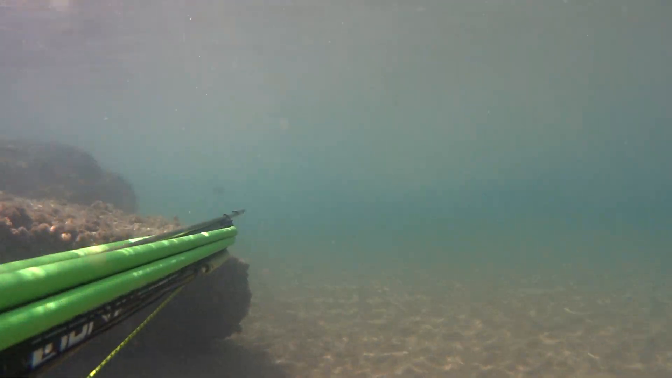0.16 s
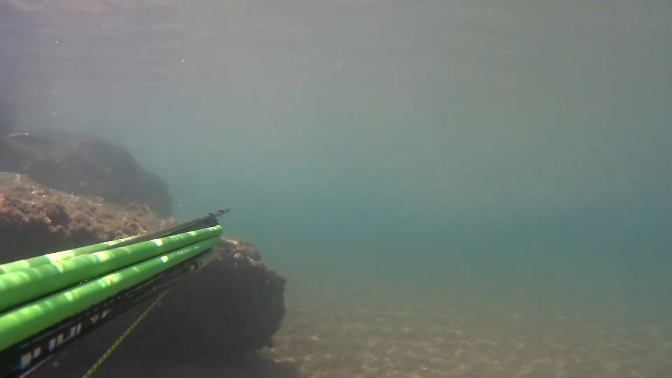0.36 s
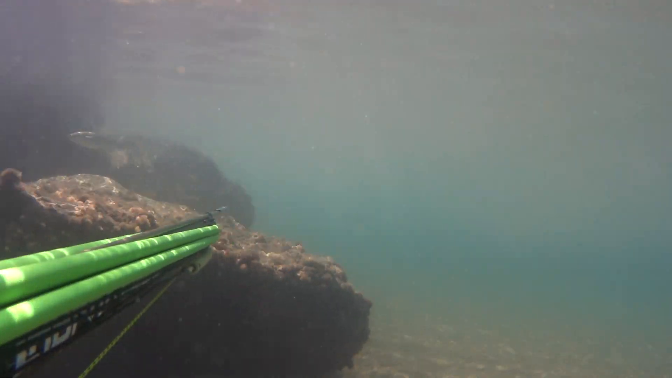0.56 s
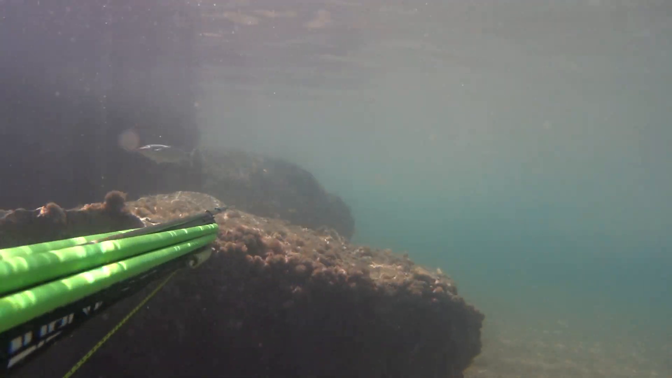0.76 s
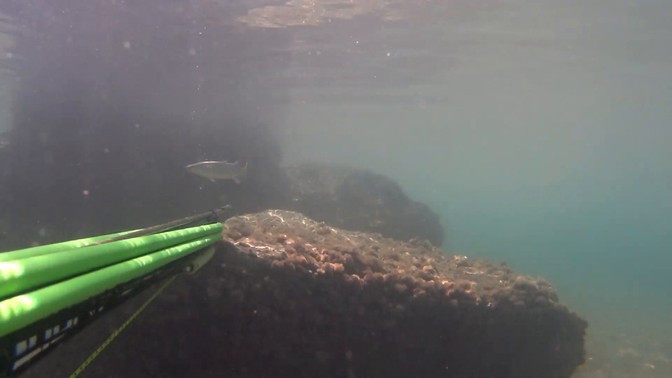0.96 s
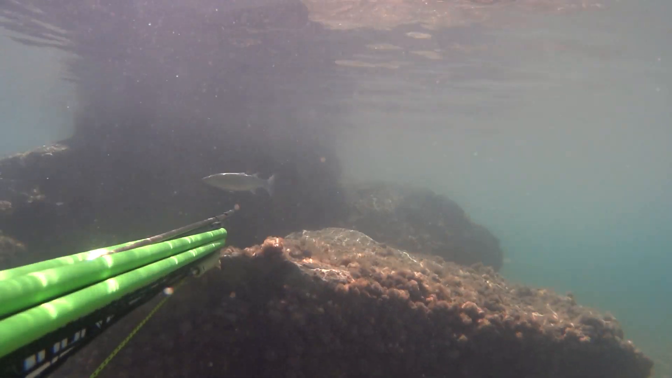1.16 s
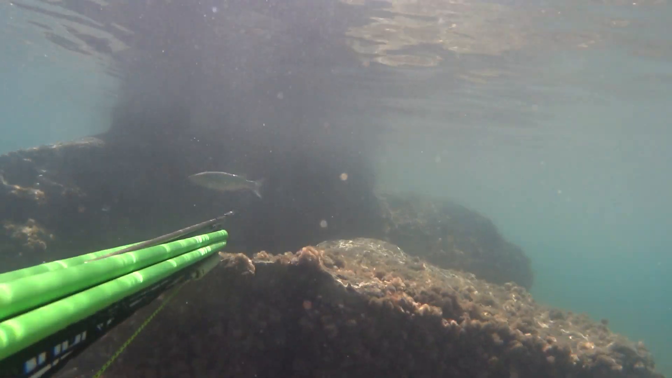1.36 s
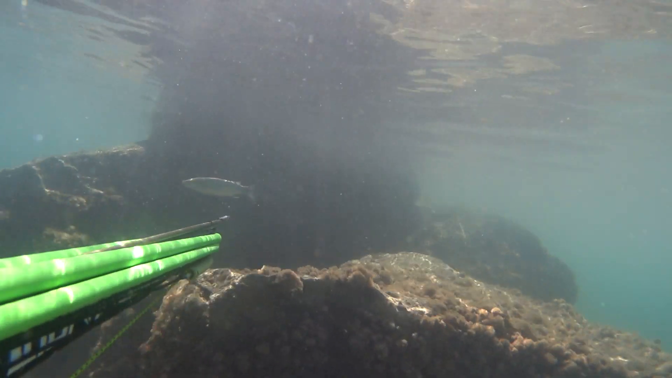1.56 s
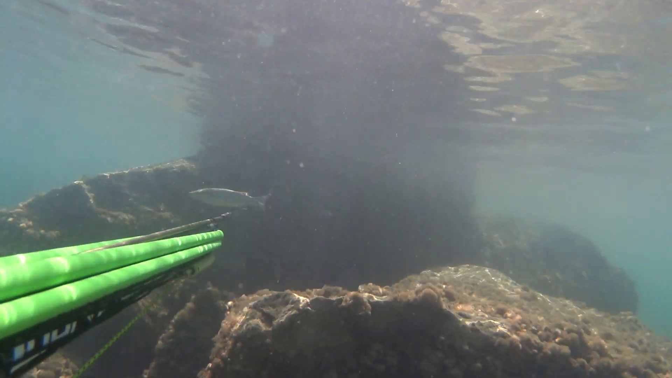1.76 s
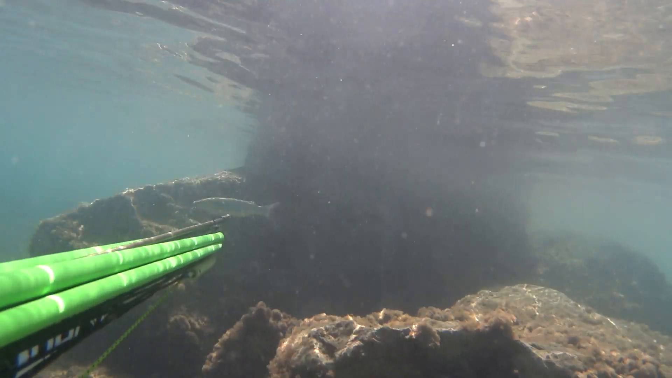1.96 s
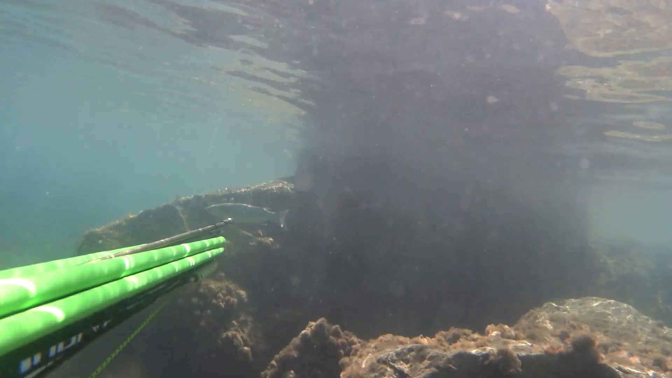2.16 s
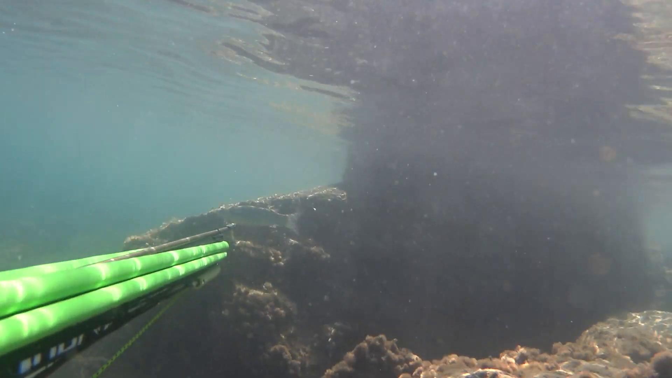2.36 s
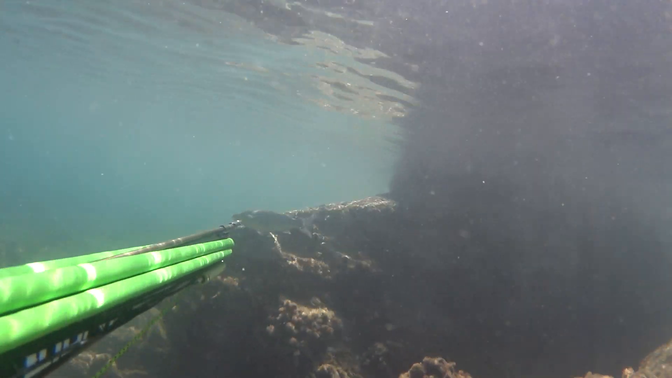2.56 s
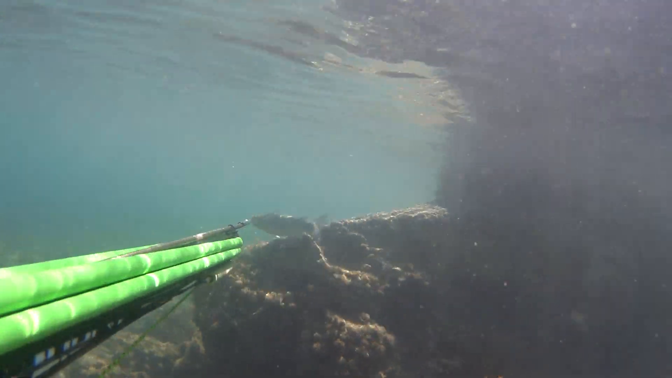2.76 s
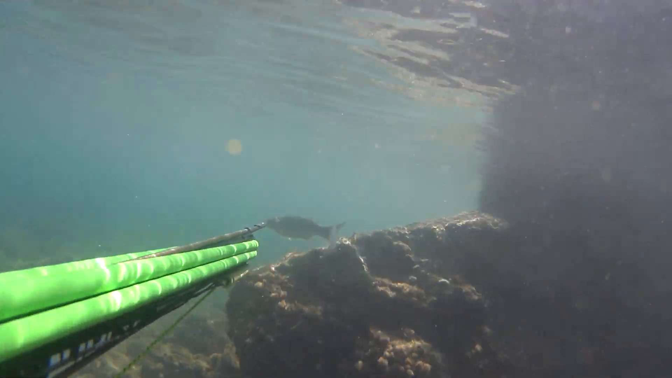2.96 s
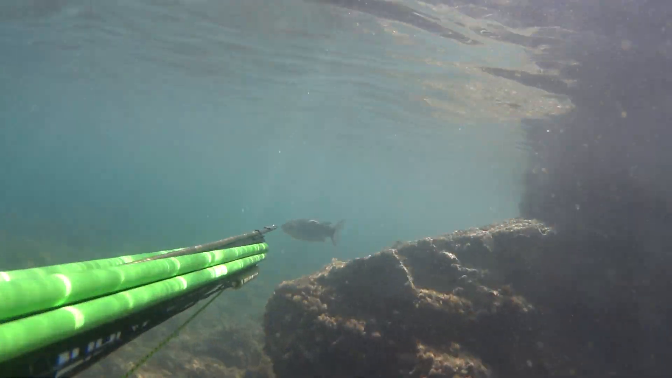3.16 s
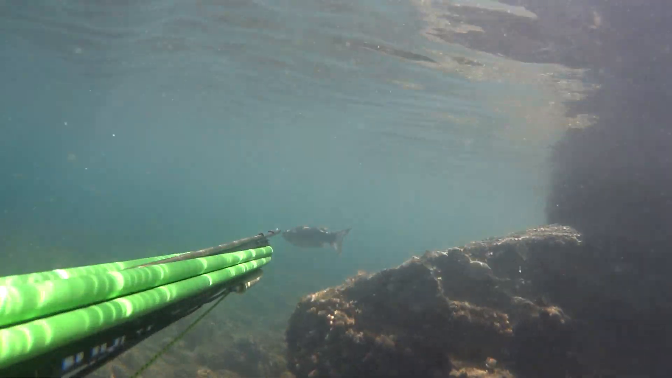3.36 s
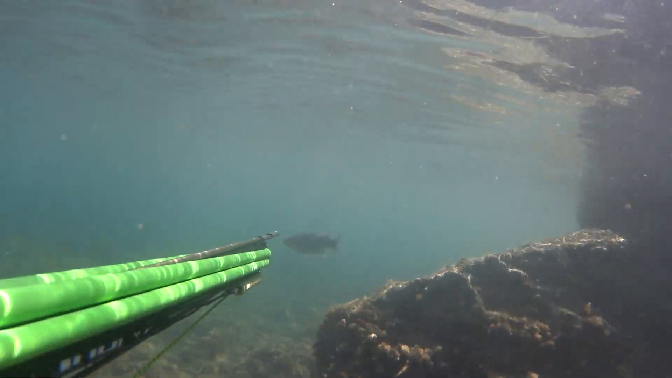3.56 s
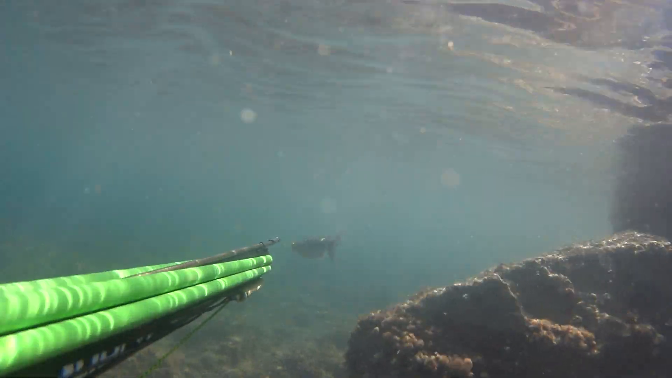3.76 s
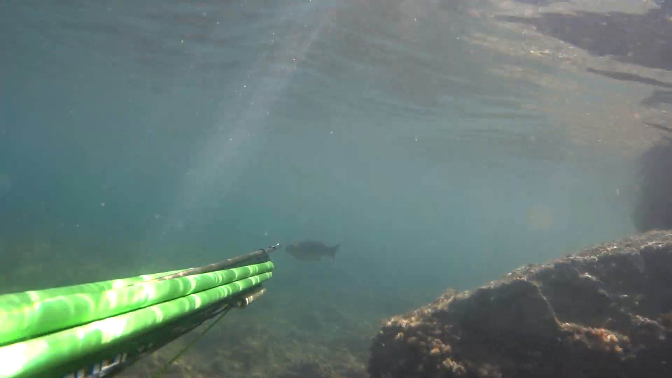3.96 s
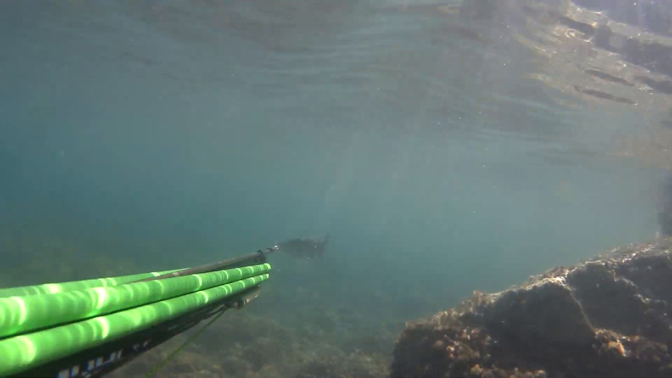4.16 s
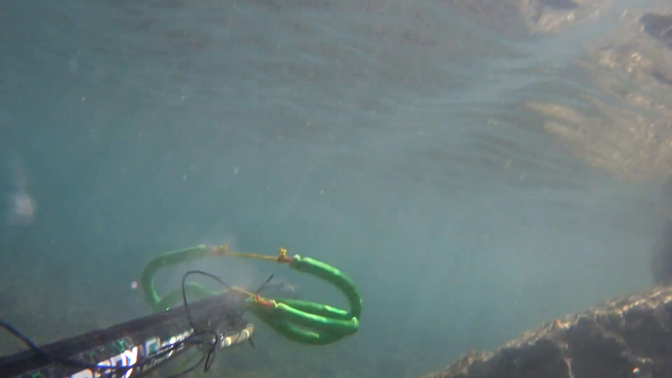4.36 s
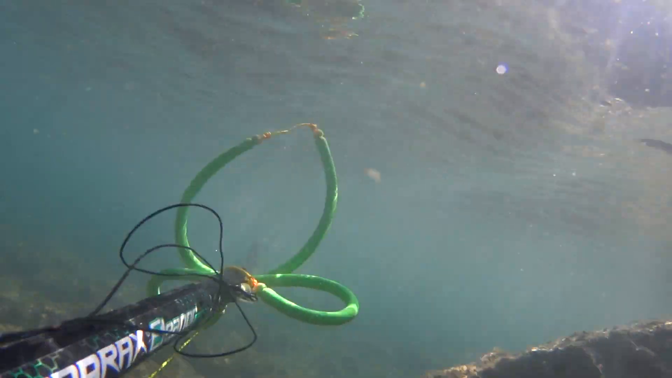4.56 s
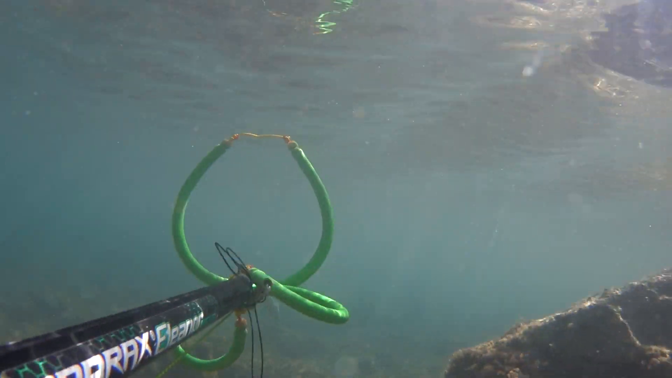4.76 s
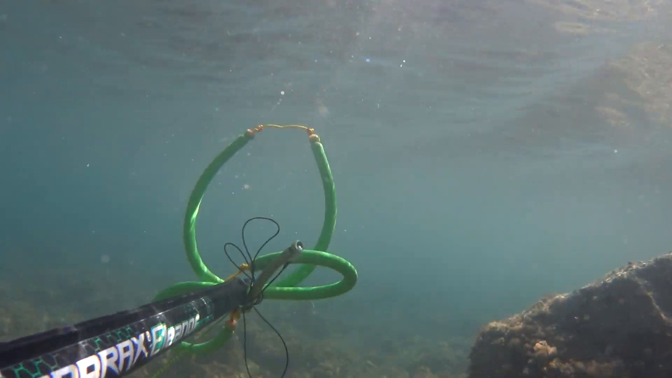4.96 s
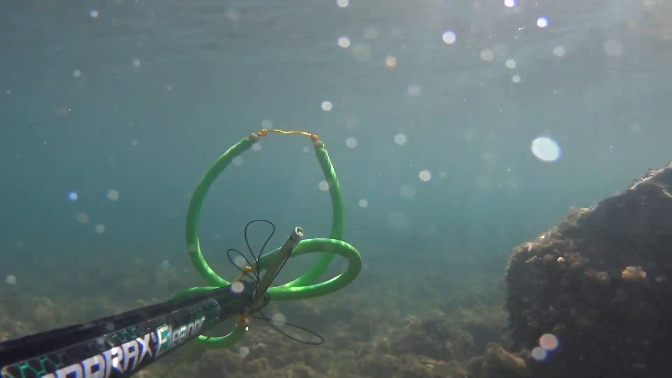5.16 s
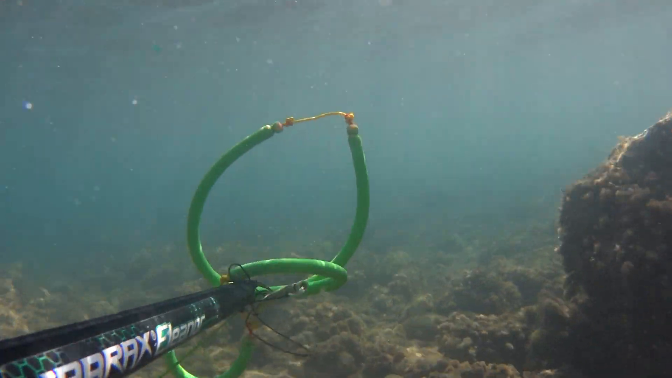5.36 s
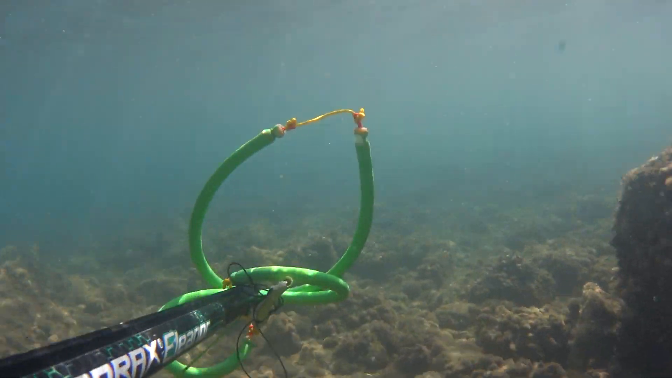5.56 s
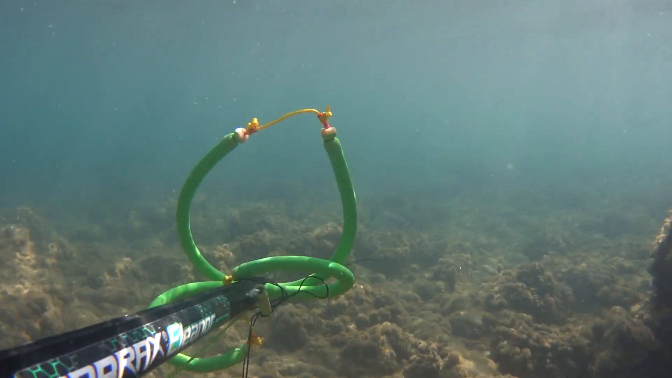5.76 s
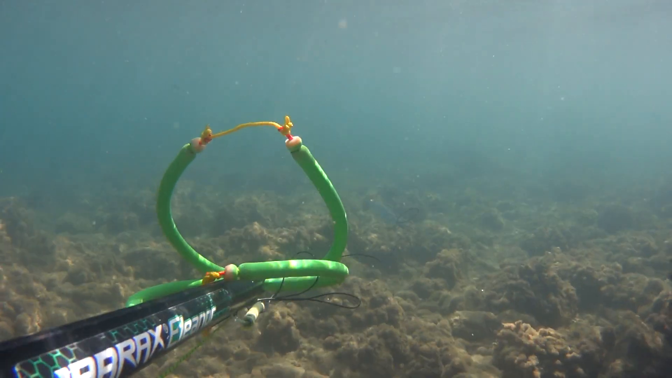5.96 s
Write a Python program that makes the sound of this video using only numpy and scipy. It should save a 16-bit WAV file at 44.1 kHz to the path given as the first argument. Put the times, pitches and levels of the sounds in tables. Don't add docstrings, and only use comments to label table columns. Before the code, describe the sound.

Under shallow water, two microphones sealed on the gun catch constant wide hiss and sparse tiny crackles. A hand knocks the housing softly, then only occasional ticks remain. The trigger lets go with a very loud boxy crack, rapid rubber slaps and a grainy watery rush that dies quickly. The running line tugs and snaps taut in a second bright crack, ringing the steel shaft briefly, before quiet knocking and scraping.

```python
import sys
import numpy as np
from scipy import signal
from scipy.fft import rfft, irfft, next_fast_len
from scipy.io import wavfile

SR = 44100
rng = np.random.default_rng(int(sys.argv[2]) if len(sys.argv) > 2 else 0)


def store_pcm(level_fs):
    pcm = np.round(np.clip(level_fs, -1, 1) * 32767).astype(np.int16)
    wavfile.write(sys.argv[1], SR, np.atleast_2d(pcm).T)


def attenuation_scalar(level_db):
    decades = np.asarray(level_db, float) / 20
    return 10 ** decades


N = 265482
TRIGGER_S, TAUT_S = 4.33, 4.768

# pitch_hz, t60_s, level_db, left_right_db, left_lead_rad
HOUSING_MODES = [
    [(64, 0.082, -11, -4.5, 0.6), (120.3, 0.048, 1, -4.5, 1.3), (175, 0.065, -4.5, -3.5, 1.1)],
    [(236.3, 0.055, -3, 0.75, 2.791), (311.4, 0.049, 0, -0.2, 2.415), (428.25, 0.0342, -2, 2.5, 1.51),
     (508, 0.054, -3.5, 1.5, 2.61)],
    [(642.9, 0.019, -0.5, 2, -2.003), (746.6, 0.03115, 0.6, 3.5, -2.012), (874.6, 0.018, -3, 1.5, -1.77)],
    [(999.8, 0.021, -10, -1.5, -1.2), (1158, .024, -8, -4, -1.1), (1320, 0.0244, -2, -5.5, -0.84),
     (1410, 0.02054, -1, -2.5, -1.3), (1600.3, 0.015, -9, -5.5, -0.85), (1925, 0.014, -11, 6.5, 1),
     (2313, 0.016, -21.5, -2, 0.67)],
]
# start_s, peak_db, body_db (relative), favoured_ring_hz
GRIT_TICKS = [(0.7205, -48, -25.5, 1476), (0.7617, -45, -13.5, 1400), (1.0074, -54.5, -20, 1410),
              (1.1215, -54, -7, 950), (1.145, -55, -11.5, 1397), (1.2956, -33, -1, 921.6),
              (1.579, -44.5, -24.5, 1390), (1.589, -40.5, -17.5, 1088), (2.2802, -46, -24.5, 1384),
              (2.423, -41.5, -19.5, 1235), (2.5264, -43, -24.5, 1379), (2.6045, -48, -10, 1401),
              (2.6624, -53, -23, 1381), (2.8413, -41, -35.5, 1410), (2.9384, -58, 3.5, 1320),
              (2.764, -53, -9.5, 1283), (3.092, -42, -22.5, 1150), (3.9234, -51, -6.5, 1132),
              (4.1797, -38.5, -32, 1410), (5.0404, -46, -12.5, 1326), (5.1393, -50.5, -19, 1495),
              (5.504, -46.5, -7, 1493), (5.7359, -42, -5.5, 1144), (5.863, -54, -0.5, 1355),
              (5.9471, -38, -12, 1410), (5.9973, -47, -10.5, 1358)]


def unit(x):
    return x / np.sqrt(np.mean(x ** 2) + 1e-20)


def along(points, hz):
    point_hz, value = np.transpose(points)
    return np.interp(np.log(hz + 1), np.log(point_hz + 1), value)


def curves(rows):
    s, *columns = np.transpose(rows)
    return [np.interp(np.arange(N) / SR, s, column) for column in columns]


def lumps(rate, depth_db):
    knots = rng.standard_normal(5000)
    swing = np.interp(np.arange(N) * rate / SR, np.arange(len(knots)), knots)
    return unit(attenuation_scalar(depth_db * swing))


def coloured(x, response):
    m = next_fast_len(N)
    return irfft(rfft(x, m) * response(np.fft.rfftfreq(m, 1 / SR)), m)[..., :N]


def ring(hz, t60, pan_db, lead, turns):
    t = np.arange(int(t60 * SR)) / SR
    shape = (1 - np.exp(-t * hz / turns)) * attenuation_scalar(-60 * t / t60)
    side = np.array([[.5], [-.5]])
    return shape / shape.max() * attenuation_scalar(pan_db * side) * np.sin(2 * np.pi * hz * t + lead * side)


def add(out, s, sound):
    part = out[:, round(s * SR):][:, :sound.shape[1]]
    part += sound[:, :part.shape[1]]


def hiss():
    # pitch_hz, density_db (per Hz)
    mid_spectrum = [(15, -47.5), (25, -17), (66, -9), (96, -23.5), (118, -13.5), (303, -3.5), (603, 0),
                    (979, -1.5), (1260, -1.5), (1360, -1), (1550, -3), (2510, -7), (11000, -18),
                    (14300, -52.5), (22000, -120)]
    # pitch_hz, side_over_mid_db
    side_boost = [(60, -5), (190, 6), (600, 10.5), (2000, 6.5), (3600, 1.5), (6500, -3), (11000, -6)]
    # pitch_hz, share of the side a quarter turn from the mid
    quarter_turn_share = [(60, .6), (300, .75), (2000, 0.54), (5000, 0.26), (10000, .1)]
    level_db = -65
    a, b = rng.standard_normal((2, N))
    tie = lambda hz: np.clip(along(quarter_turn_share, hz), 0, 1)
    mid = coloured(a, lambda hz: attenuation_scalar(along(mid_spectrum, hz)))
    wide = lambda hz: attenuation_scalar(along(mid_spectrum, hz) + along(side_boost, hz))
    tied_and_free = lambda hz: wide(hz) * [-1j * tie(hz), np.sqrt(1 - tie(hz) ** 2)]
    side = coloured([a, b], tied_and_free).sum(0)
    return attenuation_scalar(level_db) * (mid + [[1], [-1]] * side) / np.std(mid)


def swell(t, s, db, fall_s):
    rise_share = .6
    return attenuation_scalar(2 * (db - 20 * np.maximum(t - s, (s - t) / rise_share) / fall_s))


def rubbing():
    # peak_s, level_db, fall_20db_s, heaviness_db
    strokes = [(.33, -67, 0.26, -14), (.45, -64.5, 0.39, -7), (.85, -66.5, .5, -7.5),
               (.67, -59.5, 0.28, -3.5), (1.136, -52.5, 0.0868, -5.5), (1.17, -66, 0.37, -5),
               (1.262, -54.5, 0.1226, 1.5), (1.33, -56.5, 0.09, 8.5), (1.44, -63, 0.19, 6),
               (2.27, -66, 0.01, -5.5), (4.185, -60.5, 0.0865, -6), (4.769, -22, 0.0241, -8.5),
               (4.84, -46, 0.0624, 0), (4.93, -62, 0.52, -0.5), (5.12, -64.5, 0.26, -7.5),
               (5.44, -65, 0.12, -7.5), (5.326, -53.5, 0.1922, -0.5), (5.53, -57, 0.107, 3),
               (5.748, -54, 0.1057, 0.5), (5.93, -54.5, 0.17, 1.5), (6.0, -58.5, 0.42, -11)]
    # peak_s, level_db, fall_20db_s
    sloshes = [(.48, -71.5, 0.49), (.8, -72.5, .5), (1.32, -58, 0.1642), (4.36, -38, 0.0707),
               (4.44, -33, 0.0785), (4.74, -49, 0.1384), (4.83, -52, 0.0571), (4.98, -65, 0.15),
               (5.33, -63.5, 0.235), (5.55, -69, 0.15), (5.78, -64.5, 0.1), (5.93, -58, 0.24)]
    # start_s, level_db, heaviness_db
    shot_drag = [
        (4.345, -24.5, 3),
        (4.376, -17, -2),
        (4.435, -27, 2.5),
        (4.479, -29.5, 2.5),
        (4.517, -41.5, 3),
        (4.611, -48.5, 0),
        (4.74, -42.5, 2),
        (4.81, -46, 4.5),
        (4.89, -70.5, 1.5),
    ]
    stroke_db = [-24, -5, 0, -4]
    drag_family_db = [-20.5, -4.5, -2, -3]
    heavy_slope = [-0.038, 1.2, .45, -.5]
    still_water_db = -85.5
    t, lean = np.arange(0, N / SR, .001), np.c_[heavy_slope]
    power = attenuation_scalar(2 * still_water_db)
    power = power + sum(swell(t, s, db + heavy_db * lean, fall_s) for s, db, fall_s, heavy_db in strokes)
    power = power * attenuation_scalar(2 * np.c_[stroke_db])
    power = power + np.c_[[1, 0, 0, 0]] * sum(swell(t, *row) for row in sloshes)
    s, drag_db, heavy_db = np.transpose([(TRIGGER_S, -99, 0), *shot_drag, (5, -99, 0)])
    leaning_db = np.interp(t, s, heavy_db) * lean
    power = power + attenuation_scalar(2 * (np.interp(t, s, drag_db) + leaning_db + np.c_[drag_family_db]))
    return curves(np.c_[t, 10 * np.log10(power).T])


def knocks():
    # start_s, peak_db, body_db (relative), low_over_middle_db
    bumps = [(.4694, -62, 2, -16), (0.6456, -55.5, -1, -5.5), (.6894, -61.5, 5, -28),
             (1.1286, -51.5, 7, -7), (1.2488, -58, 1, 1), (1.2694, -59, -1, -2), (1.323, -38, 7, -11.5),
             (1.3634, -57, 6, 4.5), (1.4047, -56.5, 13, -12), (1.428, -59, 9, -2.5), (1.4502, -62.5, 6, 0),
             (1.47, -56, 1.5, -6.5), (4.9354, -48.5, 5, -10.5), (4.9751, -53.5, 5.5, -15),
             (5.0908, -59, 1.5, -2), (5.2603, -43, -3, -3.5), (5.3055, -51.5, -1, -6.5),
             (5.3197, -54, -2.5, 1.5), (5.367, -45, -0.92, -2.5), (5.52, -54.5, 4.5, -3),
             (5.5664, -58.5, 8.5, -25), (5.7692, -57.5, 3.5, -5), (5.7895, -56, 1.5, -4),
             (5.9221, -49, 13, -1.5)]
    # start_s, peak_db, body_db (relative), low_over_middle_db, favoured_ring_hz
    slaps = [(4.332, -15, -24.5, -5, 1465), (4.3454, -18.5, 3, -12.5, 973), (4.3527, -7, -9, -5, 1440),
             (4.3666, -15, -8, 8.5, 1030), (4.3733, -13.5, -20, 4.5, 1417), (4.3833, -16.5, -13, -7, 1270),
             (4.39, -12.5, -13.5, -2, 1135), (4.3975, -13.5, -10, -6.5, 1225), (4.4009, -17, -7, 4, 1370),
             (4.415, -20, -2, -6, 1320), (4.4357, -26.5, 0, 2, 1377), (4.447, -22.5, 0.5, 1.5, 1340),
             (4.464, -22.5, -14, -5.5, 1320), (4.4824, -29.5, 6, -20.5, 1285)]
    # start_s, peak_db, body_db (relative), low_over_middle_db
    tugs = [(4.5606, -53, 10, 6.5), (4.5866, -49, 12, -6), (4.6358, -42, 7, -11.5),
            (4.6633, -34.5, -3.5, -8), (4.6841, -42.5, 7, -5), (4.7265, -27.5, -16.5, 0.83),
            (4.74, -30.5, -5, -7), (4.7674, -5, -21.5, -11), (4.7814, -25, -11, -19.5),
            (4.81, -37.5, -21, 12), (4.8234, -29, -2.5, 3), (4.8286, -35, -12, 19.5),
            (4.8397, -27, -7.5, -9), (4.8764, -44, -8, -15)]
    tick_weight_db, bump_hz, tug_hz = -8, 1370, 1320
    ticks = [(s, db, body, tick_weight_db, hz) for s, db, body, hz in GRIT_TICKS]
    bumps = [(*row, bump_hz) for row in bumps]
    tugs = [(*row, tug_hz) for row in tugs]
    return np.transpose(ticks + slaps + bumps + tugs)


def housing():
    rubs_db = rubbing()
    s, peak_db, middle_db, weight_db, spot_hz = knocks()
    low_db = middle_db + weight_db
    blows_db = peak_db + np.array([low_db - 15.5, low_db + 6.0, middle_db + 3.0, np.full(len(s), -4.5)])
    slips_per_s = 70 + 9000 * attenuation_scalar(np.max(rubs_db, 0))
    chance_of_slip = np.clip(slips_per_s / SR, 0, 1)
    slips = (rng.random(N) < chance_of_slip) / np.sqrt(chance_of_slip)
    grip = lumps(45, depth_db=1.5) * (0.8 + 0.834 * slips)
    focus = np.where(np.arange(len(s)) < len(GRIT_TICKS), 1.4, 1)
    out = np.zeros((2, N))
    for modes, rub_db, blow_db in zip(HOUSING_MODES, rubs_db, blows_db):
        level = attenuation_scalar(rub_db - 6) * grip * lumps(30, depth_db=3.0)
        chance = rng.standard_normal((len(s), len(modes)))
        body = np.zeros((2, SR // 5))
        for k, (hz, t60, db, pan_db, lead) in enumerate(modes):
            mode = attenuation_scalar(db) * (-1) ** k * ring(hz, t60, pan_db, lead, turns=2.2)
            add(body, 0, mode * attenuation_scalar(db) / np.linalg.norm(mode))
            near_db = 8 * np.exp(-(np.log2(hz / spot_hz) / 0.0874) ** 2) - 8
            near_db = near_db * (focus if hz > 990 else 1) + 4
            gains = attenuation_scalar(blow_db + near_db + 2.5 * chance[:, k])
            for at_s, gain in zip(s, gains):
                add(out, at_s, gain * mode)
        own = 1.13 * rng.standard_normal((2, N))
        rub = level * (rng.standard_normal(N) + own)
        out += signal.oaconvolve(rub, body, axes=1)[:, :N]
    return out


def all_clicks():
    # start_s, peak_db, pitch_hz, left_right_db, crack_db (relative)
    shot_clicks = [(4.332, -35, 3655, 2.5, -0.5), (4.3466, -16, 5100, 2.5, -24),
                   (4.3559, -26, 2830, 5, -14), (4.3675, -20, 2864, 12, 1), (4.3766, -16, 3440, 8, 1),
                   (4.4025, -21, 3456, 7.5, -9), (4.4204, -24.5, 4890, -2.5, -10),
                   (4.4376, -29.5, 3380, -6.5, -20.5), (4.4625, -27.5, 2500, -7, -11),
                   (4.4816, -34, 5900, 4, 2.5), (4.496, -29.5, 3613, 11.5, -17.5),
                   (4.5097, -32.5, 3990, 6, -3), (4.526, -34.5, 3233, 12, -24),
                   (4.537, -34, 2347, 3.5, -9.5), (4.5544, -49.5, 3020, 1.5, -9),
                   (4.6323, -44, 2767, 0, -11.5), (4.654, -49.5, 9380, -1, -5.5),
                   (4.7245, -50, 3530, 2.5, -4.5), (4.7404, -45.5, 3360, 0, -4),
                   (4.765, -41.5, 6270, -2, 6), (4.7685, -27, 4076, 5.5, -0.5), (4.7715, -33, 3724, 3.5, 1),
                   (4.7838, -37, 4080, -9, -16)]
    # start_s, peak_db, pitch_hz
    stray_snaps = [
        (0.4197, -52.5, 5320),
        (.7594, -61.5, 3510),
        (1.9546, -54, 5040),
        (.82, -54, 5000),
        (2.2663, -51, 4170),
        (2.9395, -56, 3640),
        (2.2655, -55, 3350),
        (4.8414, -60, 3830),
        (5.7359, -45, 2880),
        (5.949, -52, 5170),
    ]
    delay_s, snap_crack_db = .0007, -2.5
    snaps = [(*row, 0, snap_crack_db) for row in stray_snaps]
    return [(s + delay_s, *row) for s, *row in shot_clicks + snaps]


def clicks():
    out = np.zeros((2, N))
    for s, db, hz, pan_db, _ in all_clicks():
        cycles = 31.7 * (hz / 3500) ** 1.1
        add(out, s, attenuation_scalar(db - 6) * ring(hz, cycles / hz, pan_db, 1.386, turns=2.1))
    return out


def spray():
    speed_up_s, whip_s, slow_s, slack_s = .018, 0.0565, 0.1276, .028
    start_db, whip_db, slow_db, slack_db, line_db = -46.5, -34, -52, -79, -66
    taut_db, taut_end_db, taut_rise_s, taut_fall_s = -40.5, -66, .006, 0.034
    stages = TRIGGER_S + np.cumsum([-.002, .002, speed_up_s, whip_s, slow_s, slack_s])
    snap = TAUT_S + np.array([-taut_rise_s, 0, taut_fall_s, 2 * taut_fall_s])
    levels_db = [-100, start_db, whip_db, whip_db, slow_db, slack_db, line_db, taut_db, taut_end_db, -100]
    return np.interp(np.arange(N) / SR, [*stages, *snap], levels_db)


def fizz():
    # pitch_hz, density_db (per Hz)
    foam = [(1470, -31), (2500, 2), (2830, -6.5), (3050, -11), (3450, -1), (4050, -12), (4970, -2.5),
            (5560, -9.5), (6100, -8), (7220, -16.5), (11000, -24.5), (14300, -52.5), (22000, -120)]
    split_hz = [3900, 8120]
    grain_levels = [-1, -1.5, 3]
    fine_gone_s, fine_fade_s, fine_loss_db = 4.485, .025, -12
    cracks, fade = np.zeros((1, N)), attenuation_scalar(-60 * np.arange(400) / SR / 0.00349)
    for s, db, *_, crack_db in all_clicks():
        add(cracks, s, attenuation_scalar(db + crack_db - 3.5) * fade[None])
    fine_db, = curves([(fine_gone_s, 0), (fine_gone_s + fine_fade_s, fine_loss_db),
                       (TAUT_S - .1, fine_loss_db), (TAUT_S - .05, 0)])
    shared, own = rng.standard_normal(N), .7 * rng.standard_normal((2, N))
    left_leads = np.exp(.55j * np.array([[1], [-1]]))
    colour = lambda hz: attenuation_scalar(along(foam, hz)) * left_leads
    out, edges = 0, [0, *split_hz, SR]
    for low, high, grain_db, loss_db in zip(edges, edges[1:], grain_levels, [0, 0, fine_db]):
        level = attenuation_scalar(spray() - 6.5 + grain_db) * lumps(400, depth_db=4.5) * lumps(70, depth_db=1.5) + cracks
        below = lambda hz, edge: 1 / (1 + (hz / edge) ** 8)
        share = lambda hz: np.sqrt(below(hz, high) - (low > 0) * below(hz, low + 1))
        grains = attenuation_scalar(loss_db) * level * (shared + own)
        out = out + coloured(grains, lambda hz: colour(hz) * share(hz))
    return out / np.std(coloured(shared, colour))


def tick_tails():
    out = np.zeros((2, N))
    for s, db, _, hz in GRIT_TICKS:
        add(out, s, -attenuation_scalar(db - 13) * ring(hz, .045, -1, -1.27, turns=2.94))
    return out


def spots():
    # peak_s, level_db, pitch_hz, left_right_db, left_lead_rad
    whips = [(4.339, -34, 301, 0, 3.5), (4.358, -24.5, 1896, 3.5, 0.86), (4.369, -10, 1094, -5, -3),
             (4.378, -10, 1181, -3, -1.02), (4.383, -16, 1710, 3, 0), (4.393, -15, 1579, 0.5, -0.75),
             (4.399, -12, 1299, 1, -0.4), (4.417, -17, 781, 6.5, 0.94), (4.418, -12, 476.9, 2, 2.5),
             (4.419, -35.5, 2134, 0, -2), (4.433, -30.5, 1060, -2.5, 1.83), (4.438, -11.5, 580.6, 6, -3.0),
             (4.441, -19.5, 268, -1, 0.98), (4.445, -37.5, 1726, -2, -1.26), (4.448, -17.5, 655, 6.5, -1),
             (4.45, -22.5, 1193, -5, 1.4), (4.466, -21.5, 1659, 5.5, -2.5), (4.475, -26.5, 537, 10.5, -2.5),
             (4.484, -22, 1354, -3, -0.5), (4.495, -23, 277.3, 3, 1.2), (4.507, -26.5, 780, 1, 3.0),
             (4.517, -29.5, 256.4, 5.5, -1.87), (4.539, -31, 646.4, 7, -1.89),
             (4.567, -26.5, 319.7, 2, 1.0), (4.372, -12.5, 500, 1.5, 1.25), (4.356, -16.5, 750, 2, -1)]
    # peak_s, level_db, pitch_hz, left_lead_rad
    raps = [(1.125, -42, 569, -2.5), (1.136, -39, 560, -3), (1.178, -50.5, 925, -2.5),
            (1.191, -52, 495, -3), (1.202, -53, 538, -2.5), (1.21, -51, 279, -3), (1.225, -52.5, 538, -3),
            (1.238, -53.5, 684, 0), (1.241, -46, 535, -3), (1.267, -44.5, 562, -2.5),
            (1.275, -40, 785, -2.5), (1.305, -31.5, 509, 3.5), (1.38, -50, 708, -2.5), (1.409, -42, 480, 3),
            (1.431, -48.5, 319.7, 1.27), (1.454, -47, 620, -2.0), (1.454, -45.5, 260, -3),
            (1.466, -48.5, 770, -2.5), (1.472, -51.5, 331, 1.0), (1.544, -52, 495, -2.5),
            (4.582, -35, 690.5, -1.68), (4.591, -39.5, 1350, -2.16), (4.601, -37, 538, 3),
            (4.601, -32, 758, -2.5), (4.602, -36, 302, 2), (4.612, -43.5, 1320, 0.14),
            (4.624, -35, 279.7, 2.5), (4.641, -29.5, 542, 3), (4.659, -36, 280, 3), (4.7, -31.5, 753, -2.0),
            (4.702, -34.5, 493, 2), (4.71, -39.5, 1337, -1.1), (4.71, -33.5, 281, 2.5),
            (4.732, -36, 1033, -3.0), (4.734, -31, 772, -2.5), (4.766, -26, 300.3, 2.5),
            (4.771, -21.5, 922, -1.37), (4.776, -23.5, 665.7, -0.85), (4.772, -26.5, 2180, 2.5),
            (4.808, -35.5, 320, 2.5), (4.871, -42.5, 257, 2.5), (4.882, -42, 779, -1.67)]
    # peak_s, level_db, pitch_hz
    scrapes = [(5.013, -55, 279.6), (5.08, -56.5, 753), (5.108, -55.5, 1100), (5.138, -59, 869),
               (5.185, -54.5, 602), (5.186, -56.5, 411), (5.193, -56.5, 1407), (5.204, -59.5, 279),
               (5.215, -55.5, 278.5), (5.231, -49.5, 740), (5.247, -48, 716), (5.315, -49, 406.6),
               (5.381, -41.5, 675.6), (5.441, -57.5, 1240), (5.471, -59, 882), (5.474, -61.5, 1182),
               (5.479, -54.5, 1353), (5.595, -53, 668.3), (5.613, -51.5, 714), (5.641, -59, 1060),
               (5.686, -51, 757), (5.699, -56, 858), (5.742, -38.5, 669.6), (5.768, -52, 342.4),
               (5.81, -52.5, 730), (5.818, -53, 257.5), (5.838, -53, 579.5), (5.854, -48.5, 583),
               (5.868, -44.5, 1349), (5.877, -46.5, 605), (5.882, -45, 775), (5.887, -46.5, 513),
               (5.891, -46.5, 279.3), (5.964, -47, 254), (5.967, -48.5, 537), (5.98, -48.5, 1398),
               (5.999, -46, 281)]
    mode_hz, _, _, pan_db, lead = np.transpose(sum(HOUSING_MODES, []))
    scrapes = [(*row, np.interp(row[2], mode_hz, np.unwrap(lead))) for row in scrapes]
    placed = [(s, db, hz, np.interp(hz, mode_hz, pan_db), turn) for s, db, hz, turn in raps + scrapes]
    out = np.zeros((2, N))
    for s, db, hz, side_db, turn in whips + placed:
        t60 = 0.04008 * (700 / hz) ** 0.4947
        add(out, s - t60 / 7, attenuation_scalar(db - 1.01) * ring(hz, t60, side_db, turn, turns=2.4))
    return out


def thumps():
    # start_s, level_db, pitch_hz, cycles to die
    lurches = [
        (1.257, -50, 125, 6.3),
        (4.355, -39, 36, 2.3),
        (4.394, -23, 140.3, 9),
        (4.445, -24, 100, 5),
        (5.035, -58, 118, 14),
    ]
    out = np.zeros((2, N))
    for s, db, hz, cycles in lurches:
        add(out, s, attenuation_scalar(db) * ring(hz, cycles / hz, -1.5, min(hz / 100, 1.3), turns=1.4))
    return out


def narrowed_stereo(body):
    # start_s, share of the difference taken away
    narrowing = [
        (4.33, 0),
        (4.35, 0.6),
        (4.42, 0.54),
        (4.57, 0.55),
        (4.6, 0.011),
    ]
    centre_hz, width_octaves = 260, .45
    near_centre = lambda hz: np.exp(-(np.log2((hz + 1) / centre_hz) / width_octaves) ** 2)
    difference = coloured((body[0] - body[1]) / 2, near_centre)
    taken_share, = curves(narrowing)
    return body - [[1], [-1]] * np.clip(taken_share, 0, 1) * difference


def bubbles():
    # peak_s, level_db, pitch_hz, left_right_db
    torn_off = [(4.368, -22.5, 2343, -3.5), (4.389, -34.5, 4888, -1), (4.398, -35, 3590, 12),
                (4.398, -33, 2650, -7), (4.409, -41, 6287, 2), (4.412, -40, 3730, 11),
                (4.413, -39, 6018, -1), (4.414, -34, 5050, -1), (4.421, -39, 3897, 7.5),
                (4.421, -37.5, 2940, 2.5), (4.424, -36.5, 6158, 2), (4.426, -39.5, 3509, 0),
                (4.431, -38, 5361, 2.5), (4.431, -37, 5960, 1.5), (4.448, -34.5, 2691, 2),
                (4.449, -42, 6140, 5), (4.453, -39.5, 4624, -1.5), (4.456, -39, 5190, 3),
                (4.465, -36.5, 4250, -2), (4.476, -42.5, 3890, 4), (4.478, -38.5, 2893, 0.5),
                (4.488, -41, 5100, 2), (4.511, -39.5, 5350, 5), (4.528, -50, 4550, 9.5),
                (4.538, -50, 5480, 8), (4.538, -43.5, 3450, 10.5)]
    out = np.zeros((2, N))
    for s, db, hz, side_db in torn_off:
        add(out, s - .002, attenuation_scalar(db - 0.9) * ring(hz, 42 / hz, side_db, 1.3, turns=4))
    return out


def shaft():
    # level_db, t60_s
    overtones = [(-50, .3), (-52, .12), (-54, .25), (-54, .25), (-58, .15)]
    # start_s, level_db, share of free ring time, softness_db (per overtone)
    jerks = [
        (4.766, 6, .22, 1),
        (4.783, -1.5, .45, 1.5),
        (4.842, -5, 1.35, 15),
        (5.503, -11, .15, 9),
        (5.737, -3, .12, 5),
    ]
    lowest_hz = 1920
    out = np.zeros((2, N))
    for s, tap_db, free, soft_db in jerks:
        for k, (db, t60) in enumerate(overtones):
            tone = ring(lowest_hz * (k + 1), t60 * free, 3.83, 1.1, turns=3)
            add(out, s, attenuation_scalar(db + tap_db - k * soft_db) * tone)
    return out


def scene():
    struck = narrowed_stereo(housing()) + spots() + thumps() + tick_tails()
    water = fizz() + clicks() + bubbles()
    return struck + water + shaft() + hiss()


def top_cut(x):
    return signal.sosfilt(signal.butter(12, 12230, fs=SR, output="sos"), x)


def record(dry):
    soft = dry / (1 + np.abs(dry) ** 6) ** (1 / 6)
    mix = coloured(soft, lambda hz: hz < 11125)
    return top_cut(mix)


dry = scene()
out = record(dry)
store_pcm(out)
```